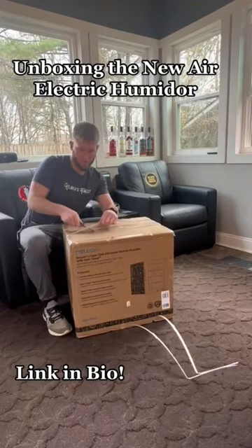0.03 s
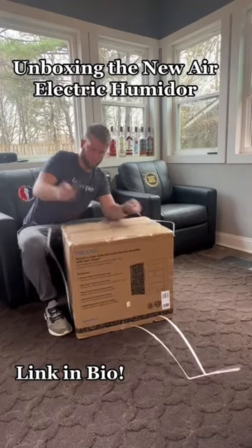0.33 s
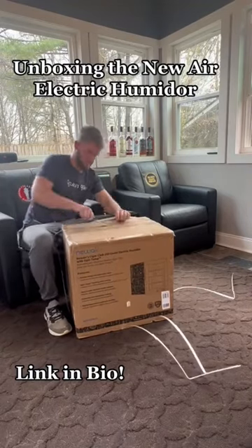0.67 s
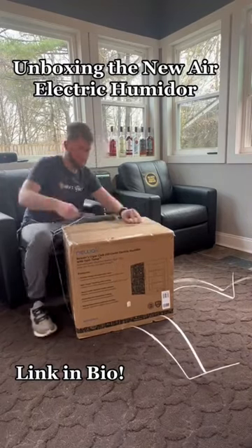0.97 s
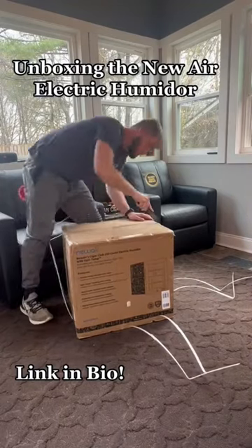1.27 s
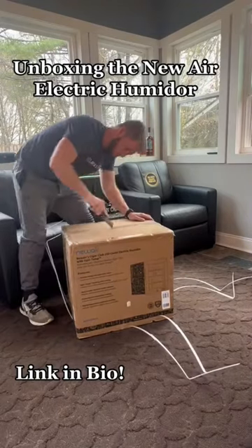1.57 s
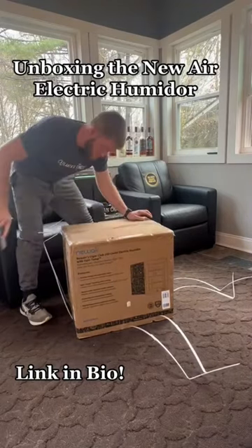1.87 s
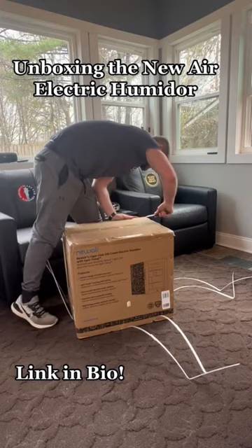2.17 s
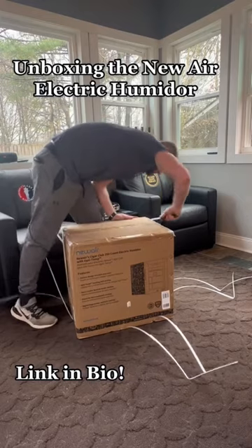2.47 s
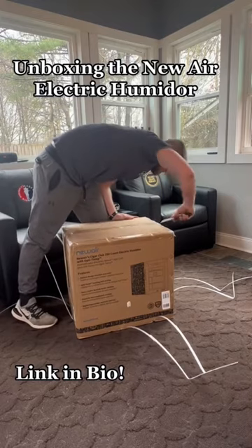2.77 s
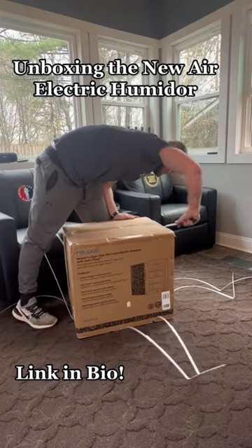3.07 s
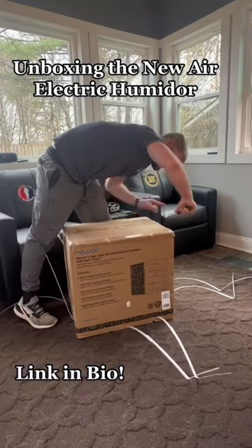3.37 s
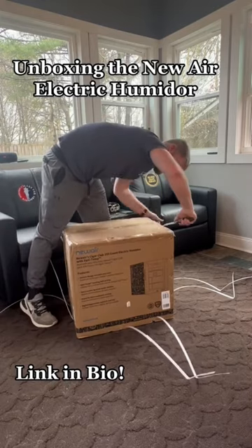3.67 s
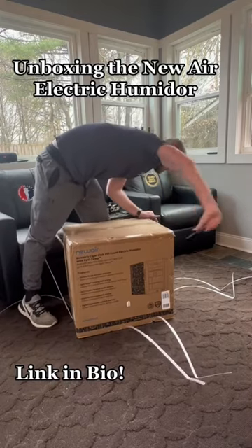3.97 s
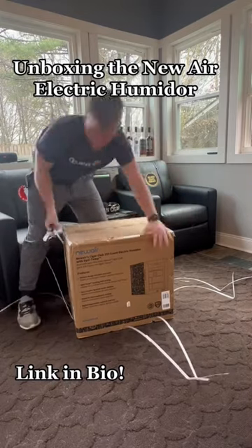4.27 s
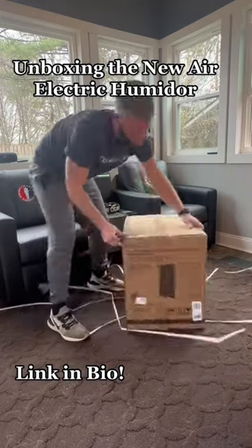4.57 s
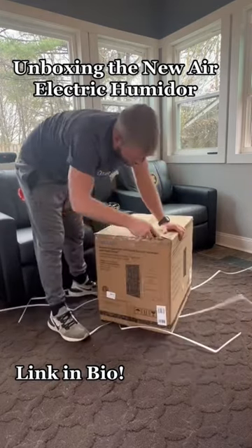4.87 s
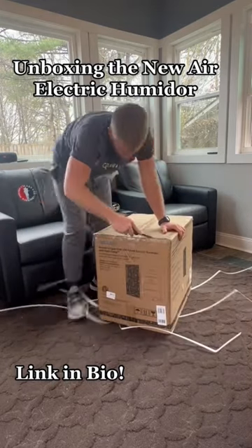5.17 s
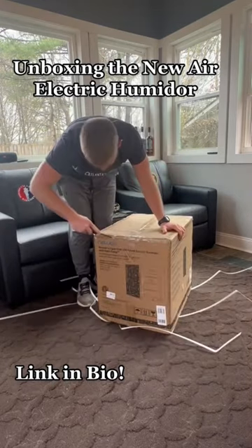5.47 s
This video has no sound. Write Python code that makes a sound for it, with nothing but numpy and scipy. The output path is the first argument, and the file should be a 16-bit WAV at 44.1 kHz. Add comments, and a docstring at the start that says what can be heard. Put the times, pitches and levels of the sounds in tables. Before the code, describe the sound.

Sharp snaps of plastic strapping, then cardboard rasping, crackling and booming dully as someone cuts a big box open over a faint hum.

```python
"""A large cardboard box is cut open in a carpeted room, a few metres away, over a faint low hum.
In the first second two plastic straps split and snap. A blade saws along the taped lid, which groans
as it judders. At three seconds a strap gives a lighter snap and loose plastic flicks about. Then the
cardboard scrapes, cracks and booms as hands and knees bump it, busiest towards the end."""
import sys
import numpy as np
from scipy import signal
from scipy.fft import rfft, irfft
from scipy.io import wavfile
from scipy.ndimage import uniform_filter1d

SR = 44100
rng = np.random.default_rng(int(sys.argv[2]) if len(sys.argv) > 2 else 0)


def to_wav(s):
    """Save 16-bit WAV."""
    ch = np.atleast_2d(s).T  # columns
    pcm = np.round(np.clip(ch, -1, 1) * 32767)  # PCM
    wavfile.write(sys.argv[1], SR, pcm.astype(np.int16))


N = 247401
TIME = np.arange(N) / SR
SPLIT_HZ = 1500  # crossover between mids and treble

# Tone of dry rubbing: frequency_hz, gain_db
FRICTION_SPECTRUM = [(120, -24.5), (200, -0.5), (244, -11.5), (313, -11), (451, -5), (532, -13),
                     (778, -11.5), (1050, -19.5), (1750, -24.5), (2840, -21), (5320, -25), (6280, -24),
                     (9200, -27.5), (9990, -41), (10500, -55.5), (13600, -84.5), (22000, -120)]


def undb(db):
    """Decibels to gain."""
    return 10 ** (np.asarray(db) / 20)


def unit(x):
    """Scale to rms 1."""
    return x / np.sqrt(np.mean(x ** 2) + 1e-18)


def steady(x):
    """Even out the loudness over a millisecond or two, leaving the fine grain."""
    return x / np.sqrt(uniform_filter1d(x ** 2, 64) + .01)


def peak_level(x, db, crest=3.16):
    """Set a burst's peak level, taking the peak as crest times the rms of its loudest 5 ms."""
    loudest_rms = np.sqrt(uniform_filter1d(x ** 2, 220).max() + 1e-18)
    return x * undb(db) / (crest * loudest_rms)


def add(track, start_s, sound):
    """Mix a sound into the track."""
    start = int(start_s * SR)
    sound = sound[max(-start, 0):N - start]
    track[max(start, 0):max(start, 0) + len(sound)] += sound


def cut(x, hz, kind, order=4):
    """Low-pass or high-pass."""
    return signal.sosfilt(signal.butter(order, hz, kind, fs=SR, output="sos"), x)


def colour(x, spectrum, size=4096):
    """Minimum-phase EQ through points of frequency_hz, gain_db."""
    hz, db = np.transpose(spectrum)
    grid_hz = np.maximum(np.arange(size // 2 + 1) * SR / size, 1)
    gain = undb(np.interp(np.log(grid_hz), np.log(hz), db))
    cepstrum = irfft(np.log(gain))
    cepstrum[1:size // 2] *= 2
    cepstrum[size // 2 + 1:] = 0
    impulse = irfft(np.exp(rfft(cepstrum)))
    return signal.fftconvolve(x, impulse)[:len(x)]


def ring(x, modes):
    """Drive a bank of resonances."""
    return sum(undb(db) * signal.lfilter(*signal.iirpeak(hz, hz / width_hz, SR), x)
               for hz, width_hz, db in modes)


def walk(rate_hz):
    """Smooth random drift at rms 1."""
    hold = int(SR / rate_hz)
    steps = np.repeat(rng.standard_normal(N // hold + 1), hold)
    return unit(uniform_filter1d(uniform_filter1d(steps, hold), hold)[:N])


def slips(samples, per_s, spread_db):
    """Tiny random fibre slips: clicks of uneven size."""
    happens = rng.random(samples) < per_s / SR
    size = undb(spread_db * np.minimum(rng.exponential(size=samples), 4))
    return unit(happens * size * rng.choice([-1, 1], samples))


def gain_curve(points, edge_s=.008):
    """Fader ride through points of time_s, level_db, fading out beyond its ends."""
    times, levels = np.transpose(points)
    outside_s = np.maximum(times[0] - TIME, 0) + np.maximum(TIME - times[-1], 0)
    return undb(np.interp(TIME, times, levels)) * np.exp(-outside_s / edge_s)


def swell(t, rise_s, fade_s):
    """Envelope that grows towards t = 0 and dies away after it."""
    return np.exp(np.minimum(t, 0) / rise_s - np.maximum(t, 0) / fade_s)


def gesture(start_s, length_s, db, growth_db=0, attack_s=0.0096, release_s=0.018):
    """Envelope of one movement: it builds until start_s, presses harder or lighter, and lets go."""
    t = TIME - start_s
    attack = np.exp(np.clip(t, -1, 0) / attack_s)
    pressure = undb(db + growth_db * np.clip(t / length_s, 0, 1))
    release = np.exp(-np.clip(t - length_s, 0, 1) / release_s)
    return attack * pressure * release


def thump(t, hz, push_s, fade_s, upper_db=-9, ratio=1.4):
    """A soft push sets a panel swinging in two quickly damped modes."""
    t = np.maximum(t, 0)
    swing = np.sin(2 * np.pi * hz * t) + undb(upper_db) * np.sin(2 * np.pi * hz * ratio * t)
    return swing * (1 - np.exp(-t / push_s)) ** 2 * np.exp(-t / fade_s)


def background(hum_hz=127.5, hum_db=-56.5, rumble_db=-57.5):
    """A wavering hum over low rumble, and a soft hiss that is turned down after about two seconds."""
    # Tone of the rumble: frequency_hz, gain_db
    rumble_spectrum = [(15, -31.5), (30, -15), (50, -4.5), (75, -1), (135, 7.5), (175, -7), (230, -13),
                       (330, -17.5), (600, -40)]
    # Tone of the hiss: frequency_hz, gain_db
    hiss_spectrum = [(120, -34), (200, -1.5), (766, -2.5), (2070, -15), (2520, -13.5), (3080, -22.5),
                     (6710, -24), (8330, -31), (10500, -46.5), (13600, -94.5), (22000, -120)]
    # Fader ride on the hiss: time_s, level_db
    hiss_levels = [(0, -56.5), (1.0, -61.5), (2.1, -60), (2.3, -64.5), (2.7, -71), (3.5, -74), (4.8, -74.5),
                   (5.6, -74)]
    pitch_hz = hum_hz + 3.6 * walk(15)
    hum = np.sin(2 * np.pi * np.cumsum(pitch_hz) / SR) * undb(walk(19))
    rumble = unit(colour(rng.standard_normal(N), rumble_spectrum))
    hiss = unit(colour(rng.standard_normal(N), hiss_spectrum)) * gain_curve(hiss_levels)
    return undb(hum_db) * unit(hum) + undb(rumble_db) * rumble + hiss


def rustling():
    """Loose straps and clothes tick lightly between the strokes."""
    # Small movements: start_s, length_s, level_db
    rustles = [(0.269, 0.032, -54.5), (0.753, 0.03, -70.5), (2.037, 0.18, -70), (2.765, 0.04, -83.5),
               (3.26, 0.15, -73), (3.573, 0.14, -73.5), (3.982, 0.053, -59.5), (4.123, 0.032, -63.5),
               (4.873, 0.11, -61.5)]
    friction = colour(slips(N, per_s=2700, spread_db=1.6), FRICTION_SPECTRUM)
    ticks = unit(cut(friction, 650, "high", order=2))
    return ticks * sum(gesture(*rustle) for rustle in rustles)


def strap_flicks(lead_s=.02):
    """Loose straps of thin, hard plastic flick together in a short bright chatter."""
    # Strap against strap: start_s, level_db
    flicks = [(0.933, -41.5), (2.6524, -47), (3.3353, -52.5), (3.36, -47.5), (3.4127, -55), (3.4906, -57),
              (3.9595, -50), (4.6186, -29), (4.691, -49.5), (4.796, -58.5)]
    # Tone of hard plastic: frequency_hz, gain_db
    plastic_spectrum = [(800, -7), (2000, -6), (4000, -4.5), (6000, -2.5), (7500, 1), (9500, -3),
                        (10500, -45)]
    out = np.zeros(N)
    t = np.arange(SR // 5) / SR - lead_s
    envelope = swell(t - .003, rise_s=0.0057, fade_s=0.013)
    for start_s, db in flicks:
        chatter = colour(slips(len(t), per_s=7000, spread_db=1.8) * envelope, plastic_spectrum)
        add(out, start_s - lead_s, peak_level(chatter, db, crest=2.26))
    return out


def box_bumps():
    """A bumped panel of the box booms; the contact adds a dull knock."""
    # Hands and knees on the box: start_s, level_db, pitch_hz, knock_db (relative to the boom)
    bumps = [(0.147, -33, 153, -2), (0.555, -40, 126.4, -6.5), (0.88, -40.5, 138, -8),
             (1.52, -25, 126.5, -5.5), (1.875, -37, 127, -24), (3.016, -34, 148, -10.5),
             (3.763, -30.5, 160, -26), (3.794, -27, 150, -14), (3.869, -16.5, 149, -18),
             (4.211, -28.5, 111, -18), (4.23, -24, 152, -32), (4.381, -27.5, 178, -9.5),
             (5.124, -30.5, 194, -6), (5.165, -30, 211.5, -13), (5.244, -23.5, 192, -7.5),
             (5.553, -33.5, 167, 3)]
    # Resonances of the knock: pitch_hz, width_hz, gain_db
    knock_modes = [(390, 25, -2.5), (460, 140, 0), (655, 230, -3.5)]
    out = np.zeros(N)
    t = np.arange(SR // 5) / SR
    envelope = swell(t - .005, rise_s=0.0052, fade_s=0.014)
    for start_s, db, pitch_hz, knock_db in bumps:
        contact = slips(len(t), per_s=4000, spread_db=2.3) * envelope
        knock = cut(ring(contact, knock_modes), 1100, "low")
        boom = thump(t, pitch_hz, push_s=0.0053, fade_s=0.0098, upper_db=-12, ratio=1.5)
        add(out, start_s, peak_level(boom, db, crest=1.93))
        add(out, start_s, peak_level(knock, db + knock_db, crest=1.63))
    return out


def cardboard_cracks(lead_s=.05):
    """Each crack is a short avalanche of breaking fibres."""
    # Cardboard and tape giving way: start_s, treble_db, mids_db (relative to the treble)
    cracks = [(0.0175, -37, 2), (0.481, -29, -21), (0.632, -41, -18), (0.794, -48, -5),
              (1.2372, -36.5, -11), (1.2731, -42, -1.5), (1.524, -47, -1), (1.5475, -37, -14),
              (1.759, -25, -13), (2.1722, -39, -15.5), (2.319, -36, -18), (2.34, -27, -10.5),
              (2.799, -53.5, -9), (2.8355, -48.5, -5), (2.9303, -39.5, -2.5), (2.9486, -37, -8),
              (2.994, -41, -3), (3.022, -36.5, -7), (3.2462, -53.5, 2), (3.2725, -43.5, -17),
              (3.572, -59, 0), (3.6483, -51.5, -3), (3.8666, -28, -4.5), (4.0024, -40.5, -9.5),
              (4.1123, -55.5, 3.5), (4.224, -38, 3.5), (4.379, -32.5, -13), (4.901, -30, -4.5),
              (4.98, -30, -11.5), (5.0395, -31, -5.5), (5.1245, -34.5, -1), (5.1661, -32.5, 0),
              (5.2552, -28, 0), (5.4977, -29.5, -13), (5.5563, -24.5, -2.5)]
    # Tone of a crack: frequency_hz, gain_db
    crack_spectrum = [(100, -22.5), (200, 3), (340, -8), (480, -6.5), (680, -2.5), (950, -18), (1250, -8.5),
                      (1700, -17.5), (2900, -11.5), (5000, -17), (6300, -15.5), (9200, -19.5),
                      (10500, -45.5)]
    out = np.zeros(N)
    t = np.arange(SR // 5) / SR - lead_s
    envelope = swell(t - .002, rise_s=0.0036, fade_s=0.01)
    for start_s, treble_db, mids_db in cracks:
        burst = colour(slips(len(t), per_s=8000, spread_db=1.1) * envelope, crack_spectrum)
        treble = peak_level(cut(burst, SPLIT_HZ, "high"), treble_db)
        mids = peak_level(cut(burst, SPLIT_HZ, "low"), treble_db + mids_db, crest=1.52)
        add(out, start_s - lead_s, treble + mids)
    return out


def scraping():
    """Stick and slip on cardboard: a dry rasp from the surface, a hollow body from the panels."""
    # Blade, straps and hands sliding: start_s, length_s, treble_db, growth_db, body_db (over treble)
    strokes = [(0.019, 0.035, -37.5, -4.5, -0.5), (0.153, 0.016, -41, 2, -5.5),
               (0.398, 0.095, -56.5, 11.5, -2.5), (0.56, 0.02, -54.5, -2.5, 11),
               (0.882, 0.073, -57, 3.5, -2), (0.987, 0.066, -59.5, 5, 1.5), (1.143, 0.26, -65.5, 11, 1),
               (1.425, 0.099, -51.5, 4.5, 1.5), (1.527, 0.218, -45, 0.5, -2.5),
               (1.826, 0.058, -52, -3, -18), (2.321, 0.15, -46, 1.5, -2), (2.532, 0.03, -53, -3, -3),
               (2.873, 0.023, -46.5, -4, -1), (2.997, 0.035, -56.5, 3.5, 1), (3.754, 0.13, -49, 11, -1),
               (4.225, 0.157, -50.5, 9, 0.5), (4.425, 0.18, -57, 8, -1), (4.97, 0.23, -48, -2, -2.5),
               (5.257, 0.086, -37.5, -13, -3), (5.359, 0.038, -38.5, -2.5, -1.5),
               (5.455, 0.12, -48, 5.5, -4)]
    # Resonances of the panels: pitch_hz, width_hz, gain_db
    panel_modes = [(145.8, 47, 16), (195, 50, -1), (342, 36, 1)]
    friction = slips(N, per_s=5000, spread_db=1.3) * undb(1.7 * walk(90))
    rasp = colour(friction, FRICTION_SPECTRUM)
    treble = unit(cut(rasp, SPLIT_HZ, "high"))
    mids = undb(1.5) * unit(cut(rasp, SPLIT_HZ, "low"))
    hollow = unit(cut(cut(ring(friction, panel_modes), 420, "low"), 58, "high"))
    out = np.zeros(N)
    for start_s, length_s, treble_db, growth_db, body_db in strokes:
        pressure = gesture(start_s, length_s, treble_db, growth_db)
        out += pressure * (treble + undb(body_db) * (mids + hollow))
    return out


def blade_judder(catch_hz=221, wobble=0.02985, drag_db=-3, trim_db=-1.5):
    """The blade catches and jumps in step with the groaning lid; its drag rings the other modes."""
    # Resonances of the lid: pitch_hz, width_hz, gain_db
    lid_modes = [(129.5, 10.5, 7.5), (221, 34, -1.5), (438, 31, -17), (700, 61, -17.5)]
    # Swell of the groan: time_s, level_db (before the trim)
    groan_levels = [(1.39, -51), (1.534, -33.5), (1.572, -35.5), (1.664, -28.5), (1.746, -46),
                    (1.77, -36.5), (1.8, -71)]
    cycles = np.cumsum(catch_hz * (1 + wobble * walk(50))) / SR
    catches = np.diff(np.floor(cycles), prepend=0) * undb(4.1 * walk(79.4))  # one uneven kick a cycle
    groan = unit(ring(catches, lid_modes))
    drag = unit(ring(slips(N, per_s=1500, spread_db=1.2), lid_modes))
    drone = cut(cut(groan + undb(drag_db) * drag, 820, "low"), 97, "high")
    return undb(trim_db) * unit(drone) * gain_curve(groan_levels)


def strap_snaps(lead_s=.1):
    """A strap's fibres split for a moment, then it breaks with a pop, rings and slaps the box."""
    # Straps cut or yanked loose: break_s, level_db, split_db, split_s, slap_db, ring_db
    # (split, slap and ring are relative levels)
    snaps = [(0.221, -6, -11.5, 0.0063, -7, -24), (0.698, -10, -2, 0.0097, -3, -21),
             (3.048, -15.5, -6.5, 0.0042, -12.5, -11)]
    # Tone of the break: frequency_hz, gain_db
    snap_spectrum = [(60, -23.5), (120, -7.5), (250, -2), (430, 0.5), (700, -3), (1050, -7), (1800, -11.5),
                     (2800, -9.5), (4000, -16), (6500, -17), (9000, -19), (10500, -37.5)]
    # Resonances of the strap: pitch_hz, width_hz, gain_db
    strap_modes = [(1817, 90, -1.5), (2100, 70, -15), (2586, 280, 3.5), (3760, 180, -2), (4800, 110, -23),
                   (6360, 59, 9.5)]
    out = np.zeros(N)
    t = np.arange(SR // 3) / SR - lead_s
    pop = swell(t - .001, rise_s=.0005, fade_s=.0105) + .4 * swell(t - .001, rise_s=.0004, fade_s=.002)
    slap = thump(t, 215, push_s=0.0038, fade_s=0.006, upper_db=2)
    slap += undb(-2) * thump(t, 125, push_s=0.0046, fade_s=0.0084)
    for break_s, db, split_db, split_s, slap_db, ring_db in snaps:
        fibres = slips(len(t), per_s=9000, spread_db=0.73)
        ringing = undb(ring_db) * unit(ring(fibres, strap_modes))
        crackle = steady(unit(colour(fibres, snap_spectrum)) + ringing)
        splitting = np.exp(np.minimum(t + split_s, 0) / 0.0041) * (t < 0)  # builds, holds to the break
        crack = peak_level(crackle * (undb(split_db) * splitting + pop), db)
        snap = crack + peak_level(slap, db + slap_db)
        add(out, break_s - lead_s, cut(snap, 75, "high"))
    return out


def room(x, t60_s=0.14, wet_db=-11, predelay_s=.005):
    """Windows and walls return a short diffuse tail; carpet and sofas soak it up."""
    t = np.arange(SR // 3) / SR
    decay = np.exp(-np.log(1000) * t / t60_s) * (t > predelay_s)
    tail = cut(rng.standard_normal(len(t)), 370, "high") * decay
    tail /= np.sqrt(np.sum(tail ** 2))
    return x + undb(wet_db) * signal.fftconvolve(x, tail)[:N]


def scene():
    """All the work on the box, heard in the room over the background, in mono."""
    work = strap_snaps() + cardboard_cracks() + strap_flicks() + box_bumps()
    work = work + scraping() + rustling() + blade_judder()
    return (room(work) + background())[None]


def record(dry):
    """The phone cuts the top steeply above 10.1 kHz."""
    return signal.sosfilt(signal.ellip(10, .3, 80, 10100, fs=SR, output="sos"), dry)


dry = scene()
out = record(dry)
to_wav(out)
```